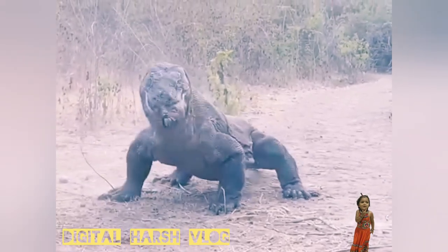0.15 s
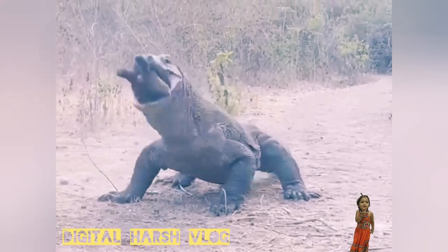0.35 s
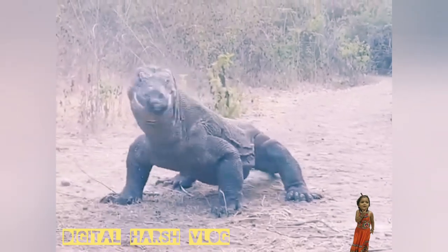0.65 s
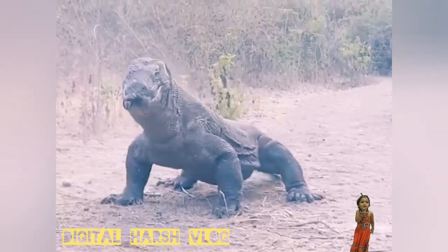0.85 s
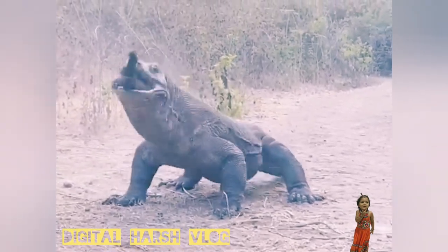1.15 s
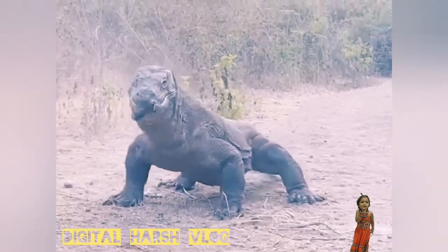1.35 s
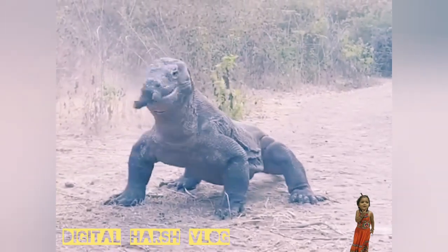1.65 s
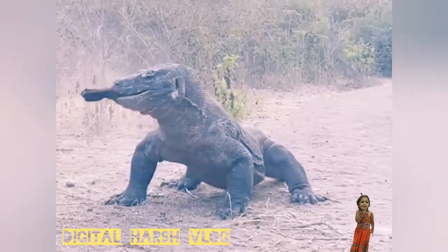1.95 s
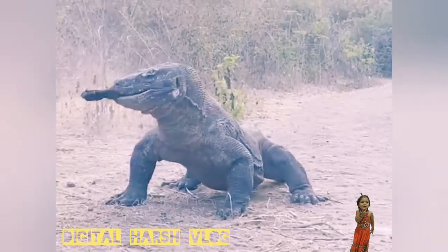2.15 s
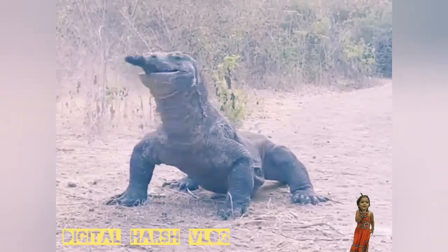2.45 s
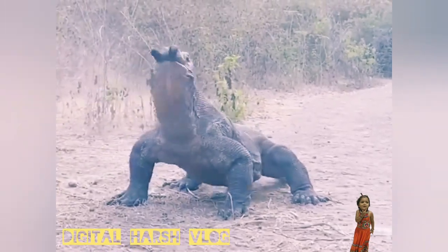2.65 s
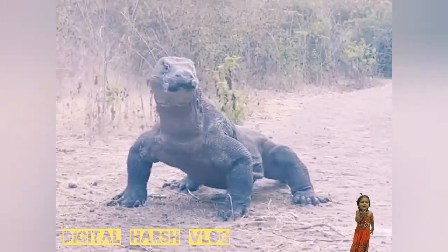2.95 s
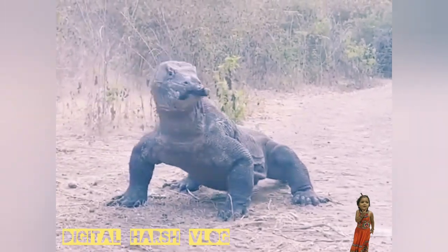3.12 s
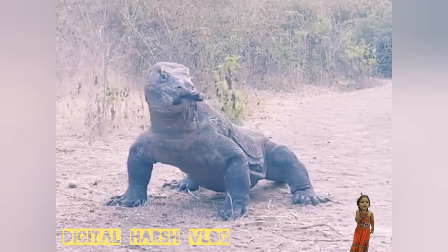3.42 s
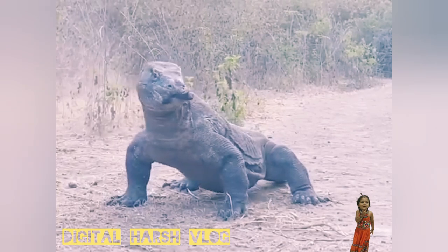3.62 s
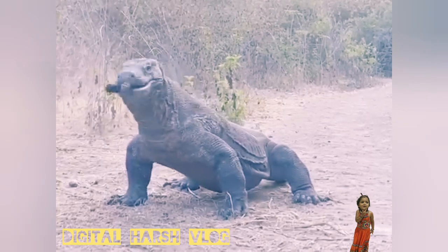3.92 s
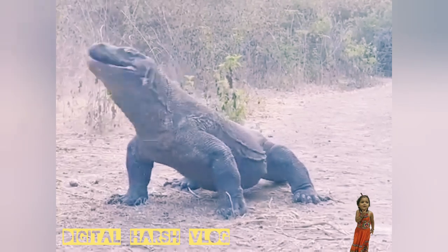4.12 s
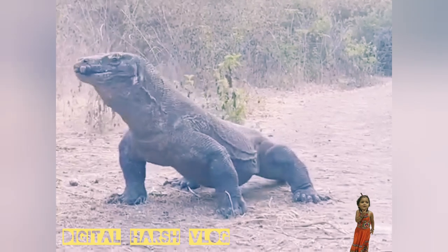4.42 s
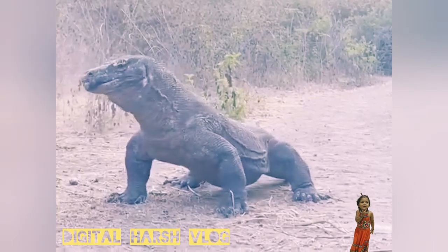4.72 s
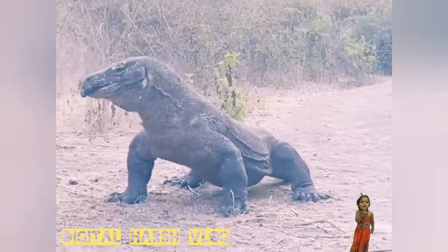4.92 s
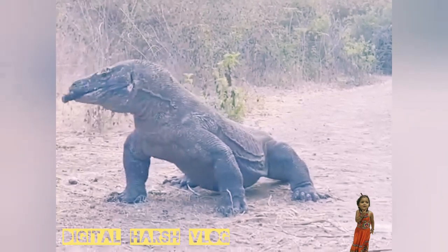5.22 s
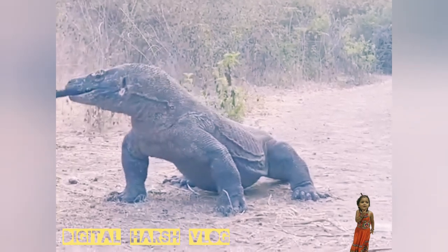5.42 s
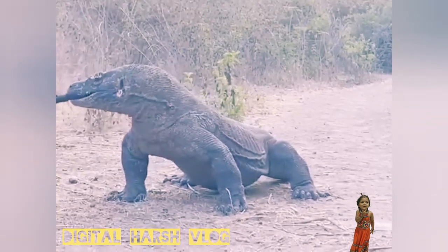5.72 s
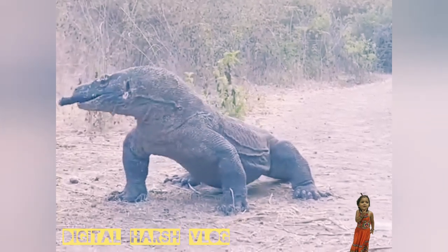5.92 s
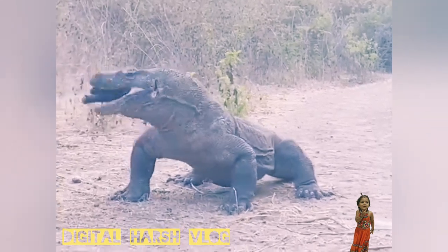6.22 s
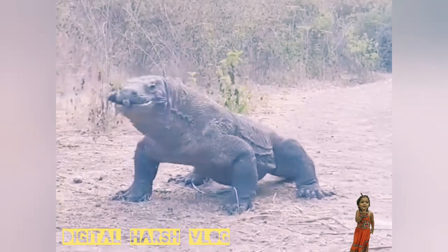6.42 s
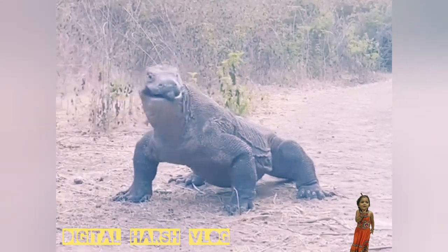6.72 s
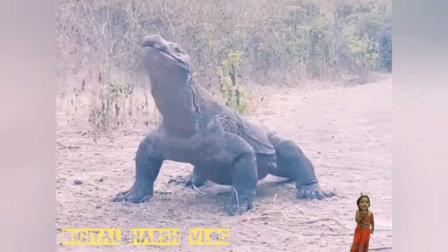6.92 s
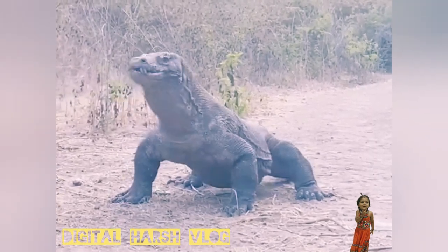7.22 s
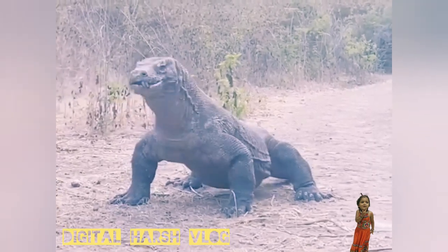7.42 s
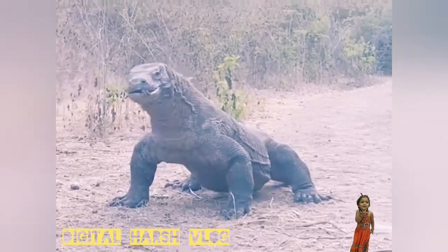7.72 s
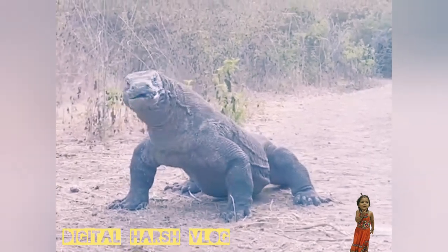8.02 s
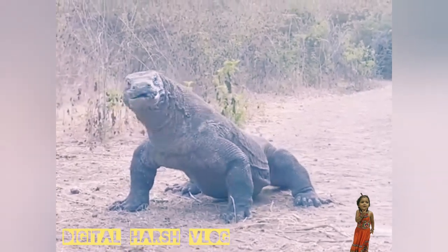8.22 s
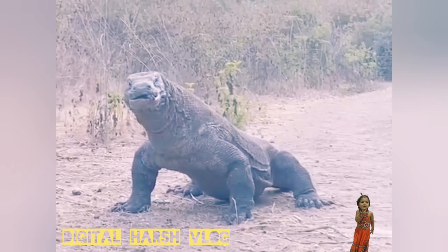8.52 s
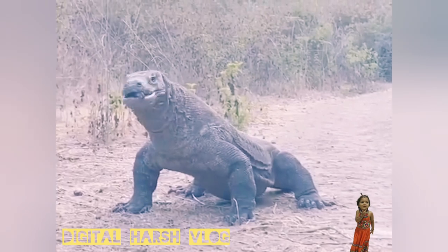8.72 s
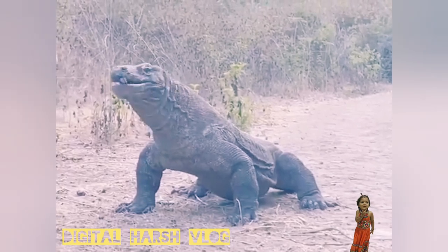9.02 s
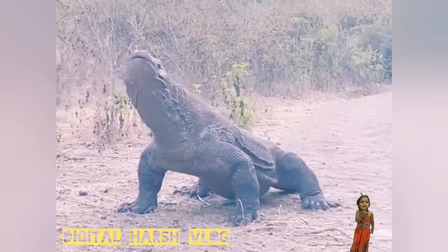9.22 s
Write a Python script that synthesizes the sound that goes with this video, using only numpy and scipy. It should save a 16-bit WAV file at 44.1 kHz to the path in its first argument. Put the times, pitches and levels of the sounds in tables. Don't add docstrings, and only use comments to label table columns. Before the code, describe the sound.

Close outdoors, a young goat gives short, high, hoarse bleats. The end of one cry comes first, then leaves stir and twigs tick, and a stick breaks with an extremely sharp, dry crack during the loudest bleat. Shorter, weaker cries follow with gaps between them, over a faint low engine drone that dips, then returns. Near the end come tiny far bird chirps, a last bleat and a soft breathy hiss.

```python
import sys
import numpy as np
from scipy import signal
from scipy.fft import rfft, irfft, next_fast_len
from scipy.io import wavfile

SR = 44100
rng = np.random.default_rng(int(sys.argv[2]) if len(sys.argv) > 2 else 0)


def how_loud(loudness_db):
    steps = np.asarray(loudness_db, float) / 20
    return 10 ** steps


def log_audio(samples):
    frames = np.atleast_2d(samples).T
    limited = np.clip(frames, -1, 1)
    pcm = np.round(limited * 32767).astype(np.int16)
    wavfile.write(sys.argv[1], SR, pcm)


N = 412313

# time [s], roar level [dB], drone level [dB].
FAR_LEVELS = [
    (0, -71, -69.5),
    (1.2, -70, -69),
    (1.9, -72, -68),
    (2.7, -72, -70),
    (3.45, -66, -64.5),
    (3.85, -66, -55),
    (9.35, -65.5, -54.5),
]
# frequency [Hz], density [dB per Hz].
ROAR_SPECTRUM = [(18, -33), (30, -6), (88, -8.5), (157, -12), (397, -12.5), (500, -14), (595, -14.5),
                 (1020, -21.5), (1340, -40), (1590, -43), (3000, -48), (3900, -78), (6600, -120)]
# multiple of the firing rate, level [dB].
ENGINE_ORDERS = [(1, 0), (2, -7.5), (3, -12.5), (4, -14.5), (5, -18.5), (7, -21), (8, -20.5)]
ENGINE_HZ = 59.8
# frequency [Hz], density [dB per Hz].
AIR_SPECTRUM = [(880, -32), (1500, -9), (5830, -17), (8320, -16.5), (9560, -30.5), (10900, -21),
                (14900, -22.5), (16000, -30)]
AIR_DB = -84.5

# start [s], end [s], first pitch [Hz], last pitch [Hz], level [dB].
BIRD_CHIRPS = [
    (7.97, 8.0, 3700, 3160, -72),
    (7.995, 8.02, 3630, 3310, -77),
    (8.18, 8.21, 4080, 3630, -79),
    (8.285, 8.31, 2800, 3240, -75.5),
    (8.335, 8.36, 3380, 3080, -75),
    (4.97, 5.12, 3470, 4080, -89),
]

# most movement [s], level [dB], time to fall 10 dB [s].
LEAF_MOVES = [
    (0.499, -75, .5),
    (0.948, -70.5, 0.4),
    (1.72, -76, 0.34),
    (2.68, -77, 0.22),
    (4.3, -87, 0.47),
    (6.92, -89, 0.93),
    (7.7, -85.5, 0.2),
    (8.4, -83.5, .2),
    (9.1, -85, 0.2),
]
STIR_DB, ONSET_FASTER = -95.5, 1.6
# frequency [Hz], density [dB per Hz].
LEAF_SPECTRUM = [(880, -38), (1500, -7.5), (2020, -1.5), (2510, -6.5), (7100, -12), (11800, -16),
                 (14500, -36.5), (16000, -43)]
# middle [s], length [s], level [dB], top frequency [Hz].
GROUND_SCUFFS = [(0.432, 0.097, -65.5, 9080), (1.559, 0.078, -61, 14330), (2.377, 0.015, -82, 15050),
                 (2.676, 0.12, -84, 8900), (4.129, 0.062, -73.5, 14060), (4.22, 0.16, -69.5, 8970),
                 (7.179, 0.061, -75, 4020), (8.005, 0.097, -75, 4510), (8.266, 0.069, -56, 2800),
                 (8.418, 0.055, -79, 12000), (9.054, 0.058, -66.5, 12150), (9.202, 0.08, -70.5, 7000)]
# frequency [Hz], density [dB per Hz].
BREATH_SPECTRUM = [(880, -31), (1500, -5), (4000, -9.5), (5660, -19), (7240, -8), (11700, -25.5),
                   (14300, -23), (16000, -47)]
HISS_S, HISS_DB, HISS_ATTACK_S, HISS_HOLD_S, HISS_RELEASE_S = 8.55, -61, 0.17, 0.15, 0.16

# time [s], peak level [dB], ring [Hz].
TWIG_TICKS = [(0.2024, -49, 2520), (0.3244, -52, 2870), (0.3546, -49, 2540), (0.4189, -45, 3920),
              (0.5791, -36, 4540), (.3985, -49, 2250), (.493, -52, 5000), (.523, -59, 2500),
              (1.4321, -57, 3310), (1.433, -50.5, 550), (1.5364, -39, 9200), (1.556, -44, 9800),
              (1.7594, -44, 1500), (1.8672, -34, 2416), (1.8864, -47, 5740), (2.389, -54, 9020),
              (2.735, -56, 6000), (1.9919, -53, 3156), (2.6194, -53.5, 3550), (2.7162, -38, 3400),
              (2.7487, -37.5, 2540), (2.8085, -51, 3234), (2.8374, -49, 2800), (3.0051, -54.5, 2870),
              (3.0869, -54.5, 2870), (3.9818, -49, 3200), (4.0946, -62, 4030), (4.103, -43.5, 550),
              (4.115, -55, 3500), (4.128, -57, 3600), (4.1629, -49.5, 1870), (7.051, -64, 5300),
              (7.078, -59.5, 5586), (7.087, -60, 3014), (7.159, -69, 5580), (7.635, -61, 4380),
              (7.3512, -54, 2860), (7.6625, -51, 4590), (7.6849, -49, 3050), (7.732, -54, 1800),
              (7.742, -59, 3700), (8.2571, -59, 2200), (8.268, -57, 1710), (8.29, -53, 2000),
              (8.404, -50, 1800), (8.4194, -62, 4970), (8.9585, -49.5, 2260), (9.0478, -43.5, 2153),
              (9.1795, -51.5, 3440)]
GRIT_TIMES = [1.3382, 1.4113, 2.059, 2.177, 3.972, 4.8454, 8.209]
GRIT_DB, GRIT_HZ, CRACK_SHARE = -60, 2800, 0.77

# time [s], peak level [dB], fall by 60 dB [s].
STICK_BREAKS = [
    (0.7477, -1.5, .012),
    (0.7531, -25, .02),
    (0.7578, -25, 0.022),
    (0.7613, -22, .012),
    (.785, -35.5, .03),
    (.799, -35.5, 0.035),
    (.768, -33, .45),
]
# frequency [Hz], width [Hz], level [dB].
STICK_MODES = [(3600, 2400, -5), (5560, 710, 0.5), (6650, 920, -2), (10050, 1500, -4.5), (13500, 2000, -14)]
# start [s], length [s], pitch [Hz], level [dB].
STICK_THUD = (.7495, .015, 215, -37.5)
SNAP_SIDE_DB = -16.5

# time [s], pitch [Hz], effort [dB],
# throat resonance [octaves above THROAT_HZ], open mouth [dB].
CRY_ENDING = [(0.0, 879, -56.5, 0.61, -7), (.092, 814, -52.5, 0.6, -19.5), (.115, 772.3, -53.5, 0.51, -23),
              (.14, 657.2, -65, 0.26, -15)]
LOUD_RISING = [(.575, 640.7, -72, 0.77, -6), (0.598, 704.7, -68, 0.2, -3), (0.617, 759, -56.5, 0.23, -14),
               (0.653, 823, -56.5, 0.41, -14), (0.707, 871, -52, .42, -14), (0.733, 944, -48, .5, -25),
               (.755, 968.4, -57, .5, -23.5)]
LOUD_FALLING = [(.76, 984, -63, .58, -21), (0.841, 962, -55, .45, -34), (0.903, 881, -45.5, 0.34, -13.5),
                (1.096, 827, -47, 0.59, -14), (1.11, 857, -43, 0.62, -9), (1.142, 825, -54, 0.54, -6),
                (1.177, 789, -54.5, 0.47, -8), (1.21, 682, -64, 0.44, -14)]
SHORT_BLEAT = [(1.48, 490, -78, 0.6, -12), (1.511, 554, -74, 0.61, -17), (1.535, 600, -68, 0.57, -4),
               (1.545, 702, -84, 0.63, -25), (1.588, 737, -55.5, 0.68, -26), (1.67, 742, -65, 0.68, -16),
               (1.75, 757, -63.5, 1, -17), (1.79, 743, -64.5, 0.88, -16), (1.84, 660, -72, 0.55, -26.5)]
BROKEN_BLEAT = [(2.78, 579, -70, 0.66, -33), (2.846, 710, -69.5, 0.17, -13), (2.97, 728, -71.5, 0.24, -31),
                (2.975, 923, -76.5, 0.44, -12), (2.995, 972, -59.5, 0.47, -22),
                (3.215, 902, -67, 0.54, -20), (3.235, 1003, -70, .55, -25), (3.295, 909, -89, 0.66, -18)]
VOICE_CATCH = [(4.185, 468.2, -82, -0.19, -3), (4.224, 570.2, -69, -0.24, -9),
               (4.28, 638.5, -72, -0.041, -2)]
CLEAR_BLEAT = [(4.285, 895.7, -58.5, 0.49, -21), (4.309, 913, -53.5, 0.52, -15),
               (4.422, 923.4, -56.5, 0.56, -10), (4.52, 901, -63, 0.63, -1),
               (4.62, 846.3, -73.5, 0.66, -0.5), (4.755, 795.8, -65.5, 0.34, -18),
               (4.86, 691.5, -77, 0.12, -18)]
NASAL_BLEAT = [(6.362, 497.2, -78, 0.52, -28), (6.41, 586.7, -76, 0.52, -19),
               (6.47, 636.2, -64.5, 0.69, -17), (6.52, 635, -64.5, 0.71, -16),
               (6.57, 650.2, -75.5, 0.63, -14), (6.764, 622.7, -62.5, 0.7, -13),
               (6.839, 601.7, -56.5, 0.84, -13), (6.903, 558.6, -54, 0.53, -18),
               (6.96, 477.5, -67.5, .25, -22)]
FAINT_BLEAT = [(7.258, 439.8, -100, 0.41, -13), (7.302, 590.4, -75, 0.4, -9), (7.34, 666, -69.5, 0.35, -14),
               (7.42, 678, -64.5, 0.32, -21), (7.539, 656.5, -73, 0.41, -13), (7.601, 650, -86, .4, -21),
               (7.682, 635, -75, 0.38, -18), (7.76, 600.6, -89, .3, -18)]
LAST_BLEAT = [(8.385, 479.5, -82.5, 0.63, -6), (8.43, 600, -79, 0.57, -6), (8.45, 650, -80, 0.68, -10),
              (8.48, 668, -60.5, 0.62, -30), (8.599, 665, -52.5, 0.55, -27.5),
              (8.67, 648.5, -67, 0.58, -12), (8.78, 610, -73, 0.5, -1), (8.9, 527, -79.5, 0.56, -13)]
# throat width [Hz], hum through the nose [dB], pinched edge [dB].
BLEAT_COLOURS = [
    (450, -55.5, -72),
    (400, -63.5, -46),
    (400, -62, -70),
    (700, -70, -55.5),
    (453, -81, -77),
    (400, -68, -76),
    (400, -78.5, -80),
    (350, -55, -63.5),
    (520, -68, -62),
    (346, -67, -59.5),
]
THROAT_HZ, THROAT_SKIRT_DB = 1400, 12
HUM_ATTACK_S, HUM_RELEASE_S, HUM_EDGE_DB = 0.021, 0.045, -15
# time [s], frequency [Hz], width [Hz].
MOUTH_TRACK = [(0, 4200, 810), (.14, 4240, 820), (.575, 2950, 400), (.63, 3280, 500), (.66, 4150, 497),
               (.755, 4040, 550), (.87, 3800, 700), (1.0, 4000, 786), (1.11, 4250, 752), (1.21, 4600, 794),
               (1.48, 4000, 250), (1.54, 4130, 250.3), (1.6, 4200, 700), (1.73, 4200, 700),
               (1.85, 3600, 498), (2.78, 3205, 684), (3.3, 3230, 680), (4.185, 2297, 665),
               (4.28, 2300, 670), (4.285, 3770, 700), (4.43, 4110, 802), (4.52, 3540, 450),
               (4.6, 3400, 450), (4.65, 2720, 600), (4.86, 2300, 500), (6.365, 4500, 604),
               (6.48, 4830, 700), (6.56, 4200, 700), (6.65, 6100, 599), (6.74, 5900, 601.6),
               (6.78, 4600, 700), (6.86, 5800, 601), (6.96, 5190, 500), (7.27, 4025, 597), (7.4, 2720, 500),
               (7.76, 2870, 700), (8.4, 4440, 505), (8.55, 4560, 601), (8.9, 3520, 995)]
MOUTH_SKIRT_DB, SKIRT_WIDER = -8, 5.0
PINCH_HZ, PINCH_WIDTH_HZ, PINCH_FADE_DB_PER_S, PINCH_PEAK_S = 2200, 160, 300.5, .03
# start [s], end [s], rasp [dB], unevenness [0-1].
HOARSE_STRETCHES = [(0, .13, -68, .3), (.66, .73, -66, .35), (.76, .89, -66, .5), (.9, 1.1, -72, .18),
                    (1.125, 1.21, -62, .5), (1.49, 1.54, -78, .2), (1.545, 1.585, -67, .5),
                    (2.99, 3.1, -82, .2), (3.1, 3.28, -78, .5), (4.25, 4.29, -69, .4),
                    (4.49, 4.55, -90, .12), (4.55, 4.615, -82, .3), (6.44, 6.62, -75, .2),
                    (6.62, 6.74, -76, .2), (6.74, 6.9, -72, .25), (7.47, 7.52, -74, .6),
                    (7.52, 7.76, -88, .5), (8.68, 8.9, -90, .3)]
# frequency [Hz], width [Hz], level [dB].
RASP_MODES = [(1840, 820, -1), (2180, 790, 1), (4200, 1000, -4)]
# start [s], end [s], first pitch [Hz], last pitch [Hz], level [dB].
SECOND_TONES = [
    (-.03, .11, 2460, 2130, -54.5),
    (.75, .9, 1770, 1750, -54.5),
    (1.135, 1.18, 2450, 2050, -57),
    (1.525, 1.58, 1618, 1770, -60),
    (1.54, 1.575, 3330, 3400, -71),
    (3.24, 3.295, 2000, 1686, -74),
    (6.72, 6.87, 2250, 2050, -61),
    (7.49, 7.57, 2300, 2100, -77),
]

# frequency [Hz], gain [dB].
FRONT_RESPONSE = [(20, -24), (40, -6.5), (55, 0), (8800, 0.5), (9100, -3.5), (10200, -7), (10500, -3.5),
                  (15200, -2.5), (15700, -24), (17000, -40.5)]
# frequency [Hz], gain [dB].
ACROSS_RESPONSE = [(60, -23.5), (200, -10.5), (700, -11.5), (1300, -2.5), (2100, -7), (2900, -25),
                   (7000, -31), (7800, -6.5), (9400, -6.5), (10300, -27), (16000, -28)]


def rms_one(x):
    return x / np.sqrt(np.mean(x ** 2) + 1e-20)


def in_time(rows):
    s, *columns = np.transpose(rows)
    return [np.interp(np.arange(N) / SR, s, c) for c in columns]


def at_hz(points, hz):
    point_hz, db = np.transpose(points)
    return np.interp(np.log(hz), np.log(point_hz), db)


def drift(rate):
    r = np.exp(-16 * np.pi * rate / SR)
    slow = signal.lfilter([1], [1, -2 * r, r * r], rng.standard_normal(N // 8 + 8002))[8000:]
    return np.interp(np.arange(N) / 8, np.arange(len(slow)), rms_one(slow))


def resonate(x, modes):
    out = 0
    for k, (hz, width, level_db) in enumerate(modes):
        r = np.exp(-np.pi * width / SR)
        a = [1, -2 * r * np.cos(2 * np.pi * hz / SR), r * r]
        b = [(1 - r * r) / 2, 0, (r * r - 1) / 2]
        out = out + (-1) ** k * how_loud(level_db) * signal.lfilter(b, a, x)
    return out


def banded(spectrum, source, low_hz, count, patchy_db):
    out, power = 0, 0
    edges = low_hz * 2 ** (np.arange(count + 1) / 2)
    for k, (low, high) in enumerate(zip(edges, edges[1:])):
        sos = signal.butter(2, [low, high], "band", fs=SR, output="sos")
        band = signal.sosfilt(sos, source[k % 2])
        level_db = at_hz(spectrum, np.sqrt(low * high))
        power += how_loud(2 * level_db) * (high - low) * 2 / SR
        out = out + band * how_loud(level_db + patchy_db * drift(7.1))
    return out / np.sqrt(power)


def whistles(rows, waver, overtone):
    out, flicker = np.zeros(N), drift(25)
    for start, end, from_hz, to_hz, level_db in rows:
        at = np.arange(max(0, round(start * SR)), round(end * SR))
        gone = (at / SR - start) / (end - start)
        hz = (from_hz + (to_hz - from_hz) * gone) * (1 + waver * flicker[at])
        phase = 2 * np.pi * np.cumsum(hz) / SR
        swell = np.clip(np.sin(np.pi * gone), 0, 1) ** 0.62
        tone = np.sin(phase) + overtone * np.sin(2 * phase)
        out[at] += swell * how_loud(level_db + 2 + 2.1 * flicker[at - 900]) * tone
    return out


def high_air():
    return how_loud(AIR_DB) * banded(AIR_SPECTRUM, rng.standard_normal((2, N)), 1400, count=7, patchy_db=1.5)


def far_engine():
    roar_db, drone_db = in_time(FAR_LEVELS)
    phase = 2 * np.pi * np.cumsum(ENGINE_HZ * (1 + .008 * drift(3))) / SR
    pulse_db = 1.1 * np.cos(phase - .6) + 1.2 * np.cos(2 * phase) + 1.0 * drift(3.963)
    noise = banded(ROAR_SPECTRUM, rng.standard_normal((2, N)), 36.57, count=12, patchy_db=1.1)
    roar = how_loud(roar_db + 7.5) * rms_one(how_loud(pulse_db)) * noise
    drone = 0
    for k, db in ENGINE_ORDERS:
        level = how_loud(db + 1.5 + 1.9 * np.sqrt(k) * drift(7.0))
        drone = drone + level * np.cos(k * phase + 0.36 * drift(4.9) * k)
    return roar + how_loud(drone_db) * drone


def birds():
    return whistles(BIRD_CHIRPS, waver=0.0061, overtone=.03)


def leaves():
    t = np.arange(N) / SR
    moves = [how_loud(db - 10 * np.maximum(t - s, ONSET_FASTER * (s - t)) / fall) for s, db, fall in LEAF_MOVES]
    level = how_loud(STIR_DB) + np.max(moves, axis=0)
    grainy = rng.standard_normal((2, N)) * rms_one(how_loud(2.5 * drift(150)))
    return level * how_loud(6.0) * banded(LEAF_SPECTRUM, grainy, 1400, count=7, patchy_db=-1.5)


def scuffs_and_hiss():
    t, out = np.arange(N) / SR, np.zeros(N)
    airy = banded(BREATH_SPECTRUM, rng.standard_normal((2, N)), 1324, count=7, patchy_db=1.2)
    for s, length, level_db, top_hz in GROUND_SCUFFS:
        near = np.abs(t - s) < length / 2
        dulled = signal.sosfilt(signal.butter(2, top_hz, fs=SR, output="sos"), airy[near])
        out[near] += how_loud(level_db) * np.cos(np.pi * (t[near] - s) / length) * dulled
    end = HISS_S + HISS_ATTACK_S + HISS_HOLD_S + HISS_RELEASE_S
    swell = np.clip(np.minimum((t - HISS_S) / HISS_ATTACK_S, (end - t) / HISS_RELEASE_S), 0, 1)
    return out + how_loud(HISS_DB) * swell ** 1.37 * airy


def twig_ticks():
    out, t = np.zeros(N), np.arange(900) / SR
    bright = signal.butter(2, [2500, 11000], "band", fs=SR, output="sos")
    hits = list(TWIG_TICKS) + [(s, GRIT_DB, GRIT_HZ) for s in GRIT_TIMES]
    cracks = signal.sosfilt(bright, rng.standard_normal((len(hits), 900)))
    attack = np.minimum(t / 0.000095, 1)
    tail = np.exp(-t / 0.000086) + 0.13 * np.exp(-t / 0.0086)
    for (s, level_db, hz), noise in zip(hits, cracks):
        ring = np.sin(2 * np.pi * hz * t) * np.exp(-t * hz / 1.7)
        at = round(s * SR)
        out[at:at + 900] += how_loud(level_db + 0.5) * attack * (ring + CRACK_SHARE * noise * tail)
    return out


def stick_snap():
    t, force = np.arange(N) / SR, np.zeros(N)
    for s, level_db, t60 in STICK_BREAKS:
        age = t - s
        force += how_loud(level_db - 60 * np.maximum(age, -12 * age) / t60)
    s, length, hz, level_db = STICK_THUD
    swell = np.sin(np.pi * np.clip((t - s) / length, 0, 1))
    thud = how_loud(level_db) * swell * np.sin(2 * np.pi * hz * (t - s))
    ringing = resonate(rng.standard_normal(N), STICK_MODES)
    crack = force * resonate(ringing, [(7000, 63000, 0)])
    return how_loud(6.5) * crack / np.linalg.norm(crack) + thud


def hoarseness():
    t, level, uneven = np.arange(N) / SR, np.zeros(N), np.zeros(N)
    for start, end, level_db, share in HOARSE_STRETCHES:
        gate = np.clip(np.minimum(t - start + 0.013, end - t) / 0.0066, 0, 1)
        level = level + how_loud(level_db) * gate
        uneven = uneven + share * gate
    return level, uneven


def bleat_timing(calls):
    t, gate, edge = np.arange(N) / SR, np.zeros(N), np.zeros(N)
    which, age = np.zeros(N, int), np.zeros(N)
    for k, rows in enumerate(calls):
        start, end = rows[0][0], rows[-1][0]
        gate = np.maximum(gate, np.clip(np.minimum(t - start, end - t) / .006 + 1, 0, 1))
        rise = (t - start) / HUM_ATTACK_S + (k in (0, 2, 6))
        fall = (end - t) / HUM_RELEASE_S + (k in (1, 5))
        edge = np.maximum(edge, np.clip(np.minimum(rise, fall), 0, 1))
        begun = t > start - .008
        which[begun] = k
        age[begun] = t[begun] - start
    return gate, edge, which, age


def bleats(jitter, shimmer_db):
    level, uneven = hoarseness()
    calls = [CRY_ENDING, LOUD_RISING, LOUD_FALLING, SHORT_BLEAT, BROKEN_BLEAT,
             VOICE_CATCH, CLEAR_BLEAT, NASAL_BLEAT, FAINT_BLEAT, LAST_BLEAT]
    gate, edge, which, age = bleat_timing(calls)
    at = np.flatnonzero(gate)
    hz, effort_db, octaves, open_db = np.array(in_time(np.concatenate(calls)))[:, at]
    throat_width, hum_db, pinch_db = np.array(BLEAT_COLOURS)[which[at]].T
    mouth_hz, mouth_width = np.array(in_time(MOUTH_TRACK))[:, at]
    from_peak = np.maximum(age[at] - PINCH_PEAK_S, 4 * (PINCH_PEAK_S - age[at]))
    pinch_db = pinch_db - PINCH_FADE_DB_PER_S * from_peak
    tremble = jitter * drift(32) + 0.008 * uneven * drift(60)
    phase = 2 * np.pi * np.cumsum(hz * (1 + tremble[at])) / SR
    flicker, out = [drift(11) for _ in range(4)], np.zeros(N)
    grain = drift(70)
    partial_hz = np.arange(14)[:, None] * hz
    throat_off = (partial_hz - THROAT_HZ * 2 ** octaves) / throat_width
    throat = (1 + throat_off ** 2) ** (-THROAT_SKIRT_DB / 6)
    throat = throat / np.sqrt(np.sum(throat[2:] ** 2, axis=0))
    for k in range(1, 14):
        unsteady = flicker[k % 4]
        if k == 1:
            gain = how_loud(hum_db + HUM_EDGE_DB * (1 - edge[at]))
        else:
            off = (k * hz - mouth_hz) / mouth_width
            shelf = (1 + np.maximum(off, -off / SKIRT_WIDER) ** 2) ** -2
            shape = (1 + off ** 2) ** -2 + how_loud(MOUTH_SKIRT_DB) * shelf
            grain_db = (2 + 5 * uneven[at]) * grain[at - 900 * k]
            mouth = shape * how_loud(open_db + 2.5 * unsteady[at - 3000 * k] + grain_db)
            pinch = how_loud(pinch_db) / (1 + ((k * hz - PINCH_HZ) / PINCH_WIDTH_HZ) ** 2) ** 2
            gain = how_loud(effort_db) * (throat[k] + mouth) + pinch
        out[at] += gate[at] * gain * how_loud(4.0 + shimmer_db * unsteady[at]) * np.sin(k * phase + k * k)
    out = out * (1 + uneven * drift(340)) / np.sqrt(1 + uneven ** 2)
    rasp = rms_one(resonate(resonate(rng.standard_normal(N), RASP_MODES), RASP_MODES))
    return out + level * rasp + whistles(SECOND_TONES, waver=0.0088, overtone=0.22)


def through(x, response, turn=1):
    size = next_fast_len(N + 2000)
    hz = np.maximum(np.arange(size // 2 + 1) * SR / size, 1)
    return irfft(turn * rfft(x, size) * how_loud(at_hz(response, hz)), size)[:N]


def scene():
    far = high_air() + far_engine()
    stick = stick_snap()
    near = birds() + leaves() + scuffs_and_hiss() + twig_ticks() + stick + bleats(jitter=.0045, shimmer_db=1.5)
    front = through(near + far, FRONT_RESPONSE)
    diffuse = near + .85 * far + .45 * np.roll(far, round(.0671 * SR))
    across = through(diffuse, ACROSS_RESPONSE, turn=1j)
    return front + (across + how_loud(SNAP_SIDE_DB) * np.roll(stick, 3)) * [[1], [-1]]


def top_cut(x):
    return signal.sosfilt(signal.butter(12, 16450, fs=SR, output="sos"), x)


def record(dry):
    return top_cut(dry)


dry = scene()
out = record(dry)
log_audio(out)
```